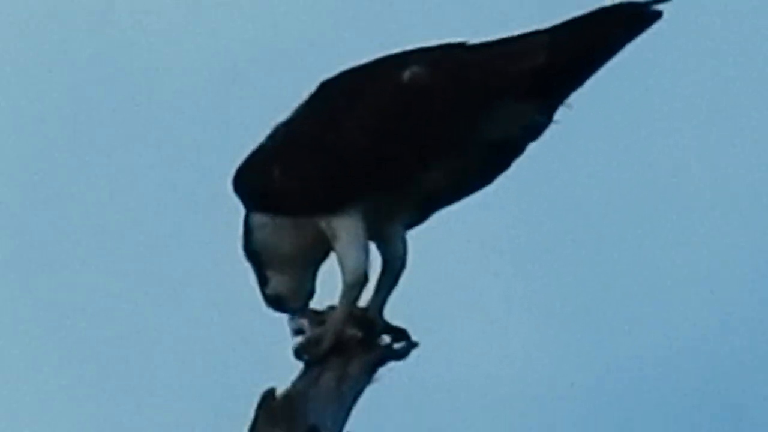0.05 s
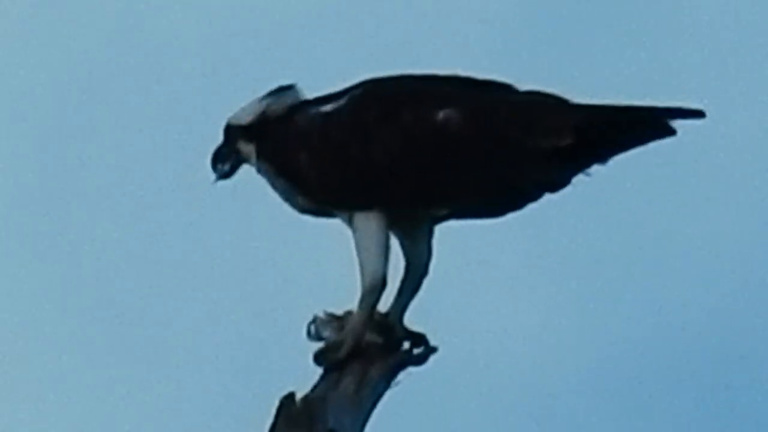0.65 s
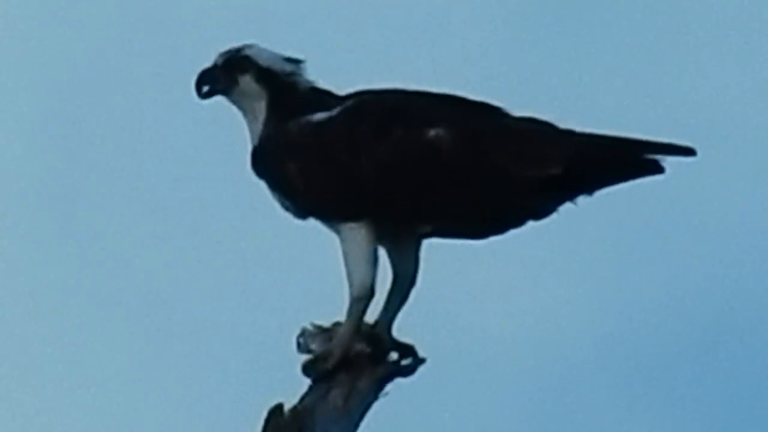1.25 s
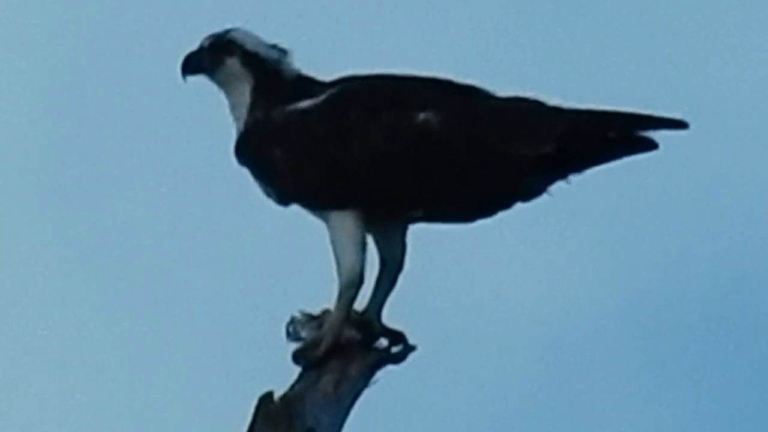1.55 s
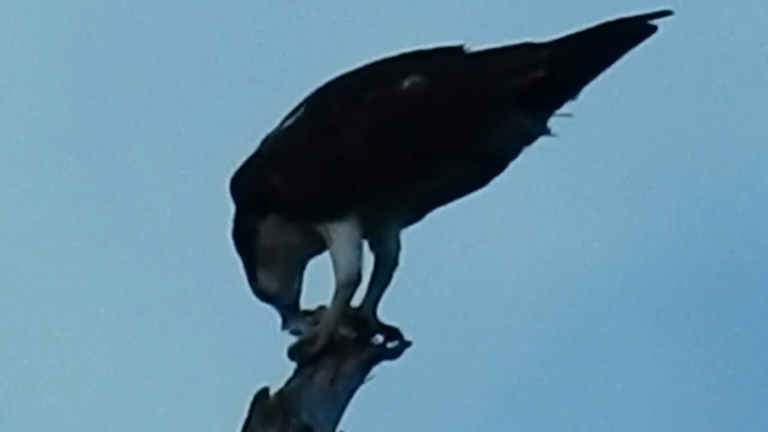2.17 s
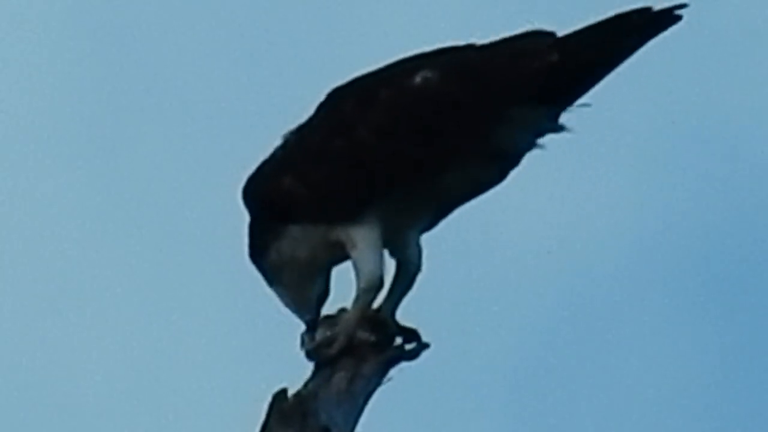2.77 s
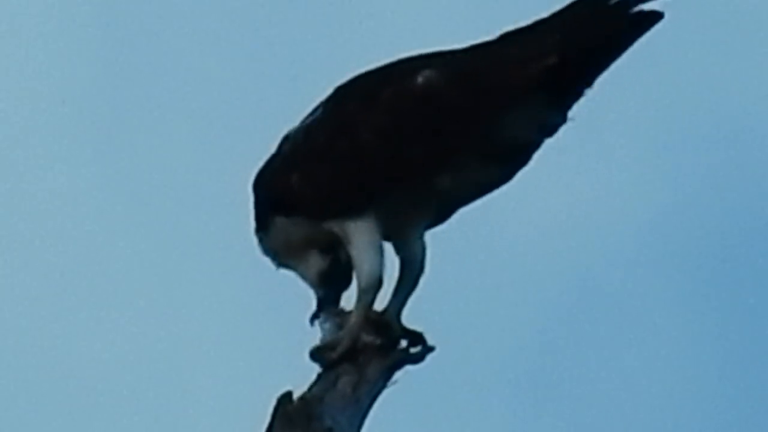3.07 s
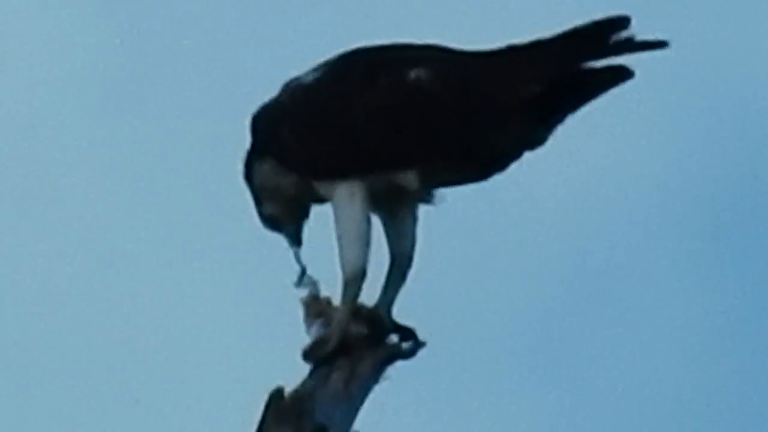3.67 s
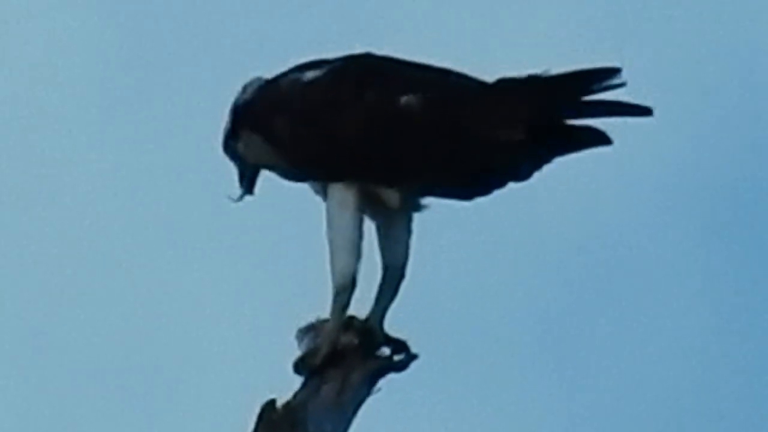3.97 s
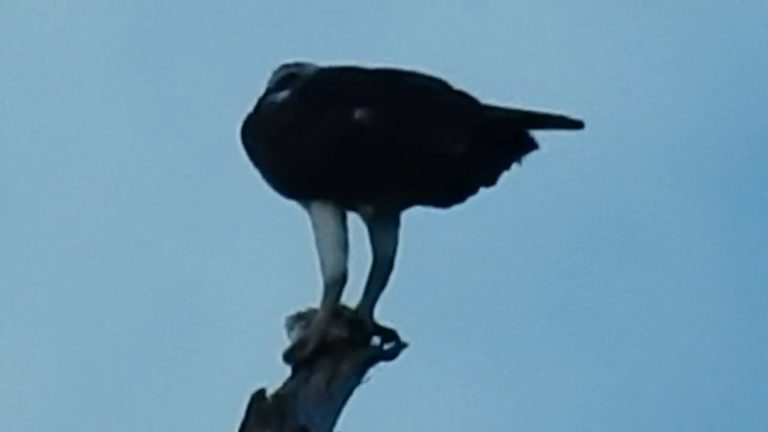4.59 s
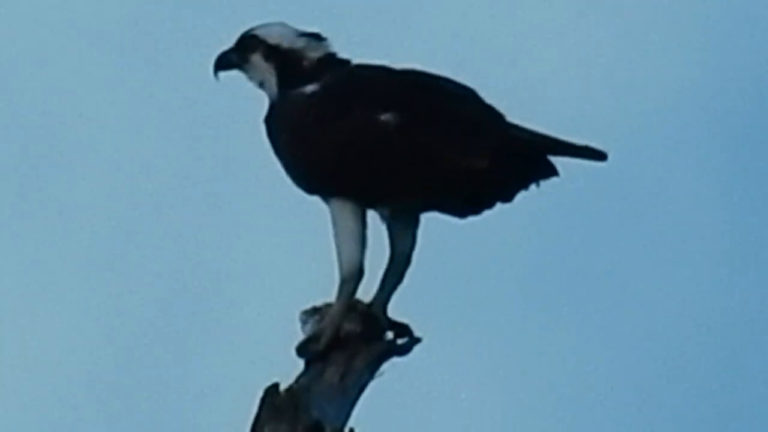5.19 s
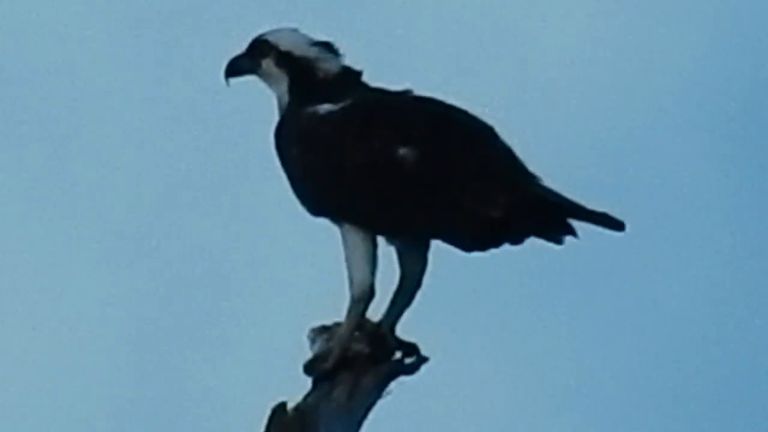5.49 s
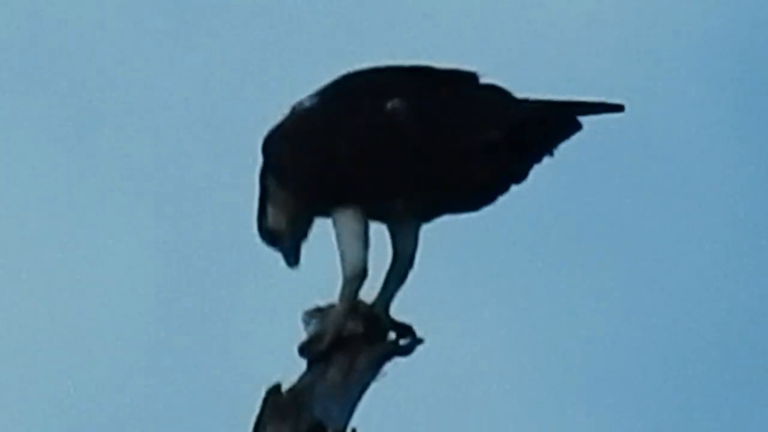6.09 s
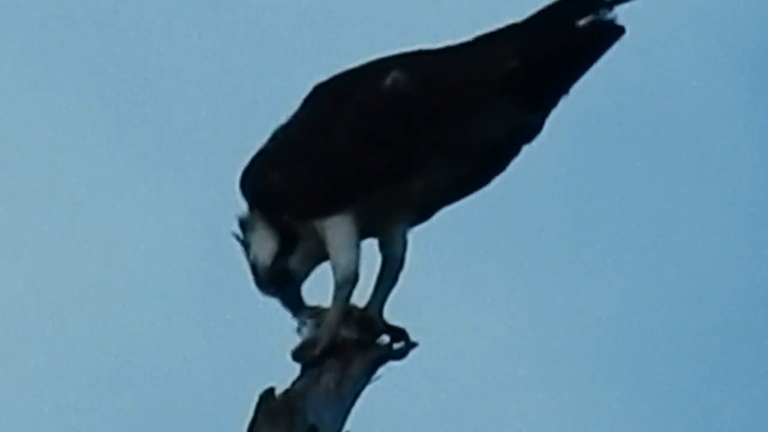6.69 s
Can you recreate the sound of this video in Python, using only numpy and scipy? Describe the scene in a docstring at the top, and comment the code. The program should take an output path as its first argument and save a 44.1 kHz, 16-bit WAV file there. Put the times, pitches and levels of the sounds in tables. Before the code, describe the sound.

Gusty wind buffets the microphone outdoors over a sizzling cicada chorus, one nearer throbbing cicada and a faint distant roar.

```python
"""A breezy summer day. From the start, gusts buffet a camera's two microphone ports, over a far roar of
traffic and trees and a sizzling cicada chorus; a near cicada on the right throbs nine times a second.
At 1 s the wings of a small insect give a short, high, stuttering buzz. The wind lulls around 2.5 s,
then returns in puffs. The near cicada slows and stops just after 5 s; at 5.6 s the small insect
buzzes again as the gusts pick up."""
import sys
import numpy as np
from scipy import signal
from scipy.fft import rfft, irfft
from scipy.io import wavfile
from scipy.ndimage import uniform_filter1d

SR = 44100
rng = np.random.default_rng(int(sys.argv[2]) if len(sys.argv) > 2 else 0)


def wav_out(sig):
    """Save sig, one row per channel (or a flat mono array), as 16-bit PCM at SR to the path in sys.argv[1]."""
    wavfile.write(sys.argv[1], SR, np.round(np.clip(np.atleast_2d(sig).T, -1, 1) * 32767).astype(np.int16))


N = 302085
TIME = np.arange(N) / SR

# strength of the wind at both ports: (time [s], level [dB])
WIND_STRENGTH = [(0, -21), (.19, -28.5), (.23, -43.5), (.41, -25.5), (.68, -29), (.72, -35), (.77, -25.5),
                 (.88, -41), (.96, -28.5), (1.3, -28.5), (1.65, -37), (2.0, -35), (2.4, -51), (2.83, -49.5),
                 (3.02, -33), (3.12, -51.5), (3.31, -34), (3.52, -42), (3.62, -31), (3.72, -42),
                 (3.88, -36), (4.0, -41), (4.33, -43.5), (4.41, -37.5), (4.72, -37.5), (5.0, -49),
                 (5.07, -37.5), (5.33, -38.5), (5.42, -57.5), (5.51, -46.5), (5.59, -29.5), (5.74, -26.5),
                 (6.2, -34.5), (6.85, -34)]


def amp(db):
    """Amplitude ratio of a level in decibels."""
    return 10 ** (np.asarray(db) / 20)


def unit(x):
    """Normalisation to rms 1."""
    return x / np.sqrt(np.mean(x ** 2) + 1e-20)


def read(points, hz):
    """Interpolation of a table on a logarithmic frequency axis."""
    f, value = np.transpose(points)
    return np.interp(np.log(hz + 1), np.log(f + 1), value)


def curve(rows):
    """Linear interpolation of a time table at every sample."""
    return np.interp(TIME, *np.transpose(rows))


def colour(x, points):
    """Zero-phase filtering by a table of (frequency [Hz], gain [dB])."""
    return irfft(rfft(x) * amp(read(points, np.fft.rfftfreq(N, 1 / SR))), N)


def drift(rate_hz):
    """Slow random modulation: low-pass noise of rms 1."""
    f = np.fft.rfftfreq(N, 1 / SR)
    return unit(irfft(rfft(rng.standard_normal(N)) * np.exp(-(f / rate_hz) ** 2) * (f > 0), N))


def ports(pan_db):
    """Constant-power panning: two gains, left exceeding right by pan_db."""
    gains = amp(np.array([pan_db, -pan_db]).reshape(2, -1) / 2)
    return gains / np.sqrt(np.mean(gains ** 2, 0))


def add(mix, start_s, sound):
    """Superposition of a sound onto the mix."""
    part = mix[..., max(round(start_s * SR), 0):][..., :sound.shape[-1]]
    part += sound[..., :part.shape[-1]]


def resonate(x, hz, width_hz):
    """Resonance at a steady or gliding frequency, by heterodyning: shift down, low-pass, shift back."""
    carrier = np.exp(2j * np.pi * np.cumsum(hz * np.ones(N)) / SR)
    pole = np.exp(-np.pi * width_hz * 1.5 / SR)
    return (carrier * signal.lfilter([(1 - pole) ** 2], [1, -2 * pole, pole * pole], x / carrier)).real


def steadied(x):
    """Division by the running rms evens out swells slower than about 1/12 s."""
    return x / np.sqrt(uniform_filter1d(x ** 2, SR // 12) + 1e-9)


def diffuse_field(spectrum, correlation):
    """Diffuse noise reaches two spaced ports with a correlation that depends on frequency."""
    left, independent = rfft(rng.standard_normal((2, N)))
    alike = np.clip(read(correlation, np.fft.rfftfreq(N, 1 / SR)), -1, 1)
    right = alike * left + np.sqrt(1 - alike ** 2) * independent
    return unit(colour(irfft(np.array([left, right]), N), spectrum))


def tree_scatter(x, t60_s, wet_db, pan_db):
    """Scattering by trunks and leaves adds decaying echoes to direct sound from the right."""
    t = np.arange(SR // 2) / SR
    taps = rng.standard_normal((2, len(t)))
    taps *= rng.random((2, len(t))) < 2000 / SR  # echoes per second
    taps *= amp(-60 * t / t60_s)
    taps *= amp(wet_db) / np.linalg.norm(taps, axis=1, keepdims=True)
    taps[1, 0] += 1
    taps[0, 3] += .5  # in the camera's shadow, the left port hears it later and weaker
    taps /= np.linalg.norm(taps, axis=1, keepdims=True)
    return ports(pan_db) * signal.fftconvolve(x[None], taps, axes=1)[:, :N]


def far_roar(level_db=-46, swell_db=.5):
    """Distant traffic and trees merge into a diffuse field, with microphone hiss on top."""
    # roar and hiss: (frequency [Hz], relative spectral density [dB])
    spectrum = [(25, -18), (70, -2.5), (130, -14), (350, -4), (650, 0.5), (950, -2.5), (1400, -9),
                (2100, -15), (3600, -19), (7000, -17.5), (9500, -29), (12000, -35), (15500, -37)]
    # likeness of left and right: (frequency [Hz], correlation [-1 to 1])
    correlation = [(60, 0.22), (300, 0.94), (640, 0.97), (1400, 0.85), (3100, 0.38), (6800, -0.3),
                   (15000, 0.32)]
    return amp(level_db + swell_db * drift(4.7)) * diffuse_field(spectrum, correlation)


def cicada_chorus(shimmer_db=.87):
    """Many far cicadas sum incoherently into one shimmering band of noise."""
    # loudness of the chorus: (time [s], level [dB])
    levels = [(0, -48), (5.0, -49), (6.0, -51), (6.85, -51.5)]
    # its balance: (time [s], left minus right [dB])
    balance = [(0, 1), (4.6, 2), (5.2, 2), (5.6, 0), (5.9, 3.5), (6.85, 5.5)]
    # its band: (frequency [Hz], relative spectral density [dB])
    spectrum = [(2000, -26), (2800, -7), (3300, -6.5), (3750, -11.5), (4000, -5), (4250, -0.5), (4700, 1.5),
                (5150, 1.5), (5700, 1), (6500, 2), (7200, -5.5), (8200, -16.5), (11000, -30)]
    # likeness of left and right: (frequency [Hz], correlation [-1 to 1])
    correlation = [(3000, 0.9), (4800, 0.62), (6000, 0.05), (8000, -0.86)]
    shimmer = shimmer_db * np.array([drift(25), drift(27)])
    return amp(curve(levels) + shimmer) * ports(curve(balance)) * diffuse_field(spectrum, correlation)


def wing_buzz(level_db=-3, stroke_hz=143, pitch_hz=7850, scrape=.43, warm_up_s=.08):
    """A pulse train: each wing stroke is a short ping, roughened by random frequency modulation."""
    # the small insect's buzzes: (start [s], end [s], relative level [dB])
    buzzes = [(1.02, 1.226, -38.5), (5.626, 5.826, -39.5)]
    strokes = np.zeros(N)
    t = np.arange(round(.0045 * SR)) / SR
    for start, end, db in buzzes:
        for s in np.arange(start, end, 1 / stroke_hz):
            cold = max(1 - (s - start) / warm_up_s, 0)  # a buzz starts soft and stuttering
            sounds = rng.random() > .5 * cold
            size = amp(db + level_db - 5 * cold) * sounds
            hz = pitch_hz * (1 + scrape * rng.standard_normal(len(t)))
            add(strokes, s, size * np.hanning(len(t)) * np.sin(2 * np.pi * np.cumsum(hz) / SR))
    buzz = colour(strokes, [(6500, -25), (7400, 5), (7800, 0), (8100, 2), (8450, -22)])
    return tree_scatter(buzz, t60_s=.3, wet_db=-7, pan_db=-3.5)


def throbs(count=45, first_period_s=.1064, last_period_s=.1278, uneven_db=1.25):
    """Amplitude modulation slows as the cicada tires: each sample's throb age, length and level."""
    # loudness of the near cicada: (time [s], relative level [dB])
    levels = [(0, -45.5), (.55, -48), (.8, -45), (1.33, -39.5), (1.46, -46), (2.05, -46.5), (2.35, -42.5),
              (2.8, -50), (3.25, -43), (3.8, -47.5), (4.05, -43.5), (4.65, -46.5), (5.05, -54)]
    periods = first_period_s + (last_period_s - first_period_s) * np.linspace(0, 1, count) ** 2
    starts = np.cumsum(periods) - periods
    dbs = np.interp(starts + periods / 2, *np.transpose(levels)) + uneven_db * rng.standard_normal(count)
    which = np.searchsorted(starts, TIME, "right") - 1
    return TIME - starts[which], periods[which], dbs[which]


def near_cicada(level_db=-3.5, click_hz=331, jitter=.04, weak_db=-4, sag_db=2, rise_s=.0084, fall_s=.017):
    """Two tymbals buckle in turn and excite resonances; the abdomen's falls as each throb stretches it."""
    # response of the tymbals: (frequency [Hz], relative gain [dB])
    tymbal_response = [(2500, -29), (3300, 11), (3750, -17), (4200, -24), (4700, -6), (5150, 19.5),
                       (5600, 18.5), (6500, 9.5), (7000, -9), (7600, -58), (10000, -40.5)]
    # resonances of the body: (frequency [Hz], bandwidth [Hz], relative level [dB])
    body_modes = [(3300, 220, -10), (4275, 130, -1), (4820, 110, -3), (5130, 130, 0), (5900, 800, -2),
                  (6600, 400, -3)]
    high_hz, low_hz, sweep_s = 5350, 4250, .027  # glide of the abdomen
    age, span, throb_db = throbs()
    gate = np.clip(age / rise_s, 0, 1) * np.clip((span - age) / fall_s, 0, 1) * amp(-sag_db * age / span)
    turns = np.floor(np.cumsum(click_hz * (1 + jitter * drift(22))) / SR)
    clicks = np.diff(turns, prepend=0) * amp(weak_db * (turns % 2) + rng.standard_normal(N))
    # each click is a volley of buckling ribs with a 1.5 ms decay
    ribs = signal.lfilter([1], [1, -np.exp(-1 / (.0015 * SR))], clicks) * rng.standard_normal(N)
    tymbals = unit(colour(ribs, tymbal_response))
    body = unit(sum(amp(db) * unit(resonate(ribs, hz, width)) for hz, width, db in body_modes))
    abdomen_hz = low_hz + (high_hz - low_hz) * np.exp(-(age / sweep_s) ** 2 / 2) + 70 * drift(30)
    swell = np.sin(np.pi * np.minimum(age / span, 1))
    abdomen = unit(resonate(ribs, abdomen_hz, width_hz=260) * swell)
    song = unit(tymbals + amp(-3.5) * body + amp(-4.5) * abdomen)
    return tree_scatter(amp(throb_db + level_db) * unit(gate) * song, t60_s=.16, wet_db=-5, pan_db=-8)


def eddy(hz, phase_cycles):
    """An eddy crossing a port is a pressure wavelet: a few cycles under a Gaussian envelope."""
    t = np.arange(-.03, .03, 1 / SR)
    return np.exp(-(t * hz) ** 2 / 2) * np.cos(2 * np.pi * (hz * t + phase_cycles))


def eddy_trains(pitches_hz, density, spread_db):
    """Shot noise: for each pitch, eddies of uneven size arrive at random, at rms 1."""
    for hz in pitches_hz:
        per_second = density * np.sqrt(hz * 200) / 2
        arrives = rng.random(N) < per_second / SR
        sizes = arrives * amp(spread_db * np.minimum(rng.exponential(1, N), 3))
        yield hz, unit(signal.oaconvolve(sizes, eddy(hz, rng.random()), "same"))


def edge_flutter(level_db=-41, onset_db=-42, growth=.18, centre_hz=310, width_octaves=.53, burst_db=4):
    """Vortex shedding: past an onset wind strength, the right port's edge sheds bursts of eddies."""
    drive = amp(curve(WIND_STRENGTH) - onset_db)
    shedding = drive ** growth * drive ** 2 / (1 + drive ** 2)  # soft threshold
    flaps = sum(train * np.exp(-(np.log2(hz / centre_hz) / width_octaves) ** 2 / 2)
                for hz, train in eddy_trains(np.geomspace(170, 900, num=9), density=.2, spread_db=2))
    bursts = unit(steadied(flaps) * amp(burst_db * np.tanh(drift(9.1))))
    return amp(level_db) * ports(pan_db=-21) * shedding * bursts


def strong_eddies(level_db=-2):
    """Pressure transients: low eddies mostly thump both ports, higher ones flap at the right."""
    # single eddies: (centre time [s], relative peak [dB], frequency [Hz], left minus right [dB])
    events = [(0.006, -12.5, 210, 4), (0.037, -18, 379, 1), (0.097, -16.5, 183.6, 1), (0.175, -13, 172, 4),
              (0.41, -25.5, 780, -19), (0.42, -16, 205, -1), (0.435, -17, 590, -26), (0.452, -17.5, 288, 8),
              (0.568, -15.5, 200, -2), (0.746, -19, 410, -27), (0.772, -18.5, 185, -2),
              (0.949, -13.5, 214, 2), (1.213, -23.5, 550, -20), (1.26, -14, 172, 2), (1.496, -17.5, 171, 4),
              (2.175, -20.5, 300, -31), (2.959, -21.5, 268, -24), (3.175, -22.5, 268, -22),
              (3.344, -20.5, 161, -3), (3.838, -23, 270, -24), (4.654, -14.5, 203, -31),
              (5.205, -22.5, 287, -25), (5.728, -20, 410, -20), (5.791, -23, 644, -21),
              (5.861, -16, 216, -1), (5.88, -18, 450, -27), (5.924, -17.5, 375, -32), (6.073, -12, 190, 0),
              (6.078, -21, 650, -28), (6.081, -18, 313, -25), (6.239, -20.5, 448, -25),
              (6.316, -21.5, 380, -22), (6.331, -23, 443, -26), (6.807, -18.5, 420, -27)]
    out = np.zeros((2, N + SR))
    for (s, db, hz, pan_db), phase in zip(events, rng.random(len(events))):
        thump = np.array([eddy(hz, phase), eddy(hz, phase + rng.uniform(-.17, .31))])
        add(out, s, amp(db + level_db) * ports(pan_db) * thump)
    return out[:, thump.shape[1] // 2:][:, :N]  # centres each eddy on its time


def buffet(force, lumpy_db=2, smooth_db=-9, tilt_db_per_octave=-3, brightening=.24):
    """Turbulence at one port holds eddies of all sizes; harder gusts shed more small, high ones."""
    # wind through the camera's low cut: (frequency [Hz], relative spectral density [dB])
    spectrum = [(20, -31), (40, -24), (68, -2), (88, -16), (115, -3.5), (175, 3.5), (270, -10),
                (400, -19.5), (700, -31), (1200, -34.5), (3000, -38.5), (9000, -72)]
    cloud = np.zeros(N)
    for hz, train in eddy_trains(np.geomspace(110, 1100, num=14), density=.11, spread_db=3):
        octaves = max(np.log2(hz / 250), 0)
        band_gain = np.sqrt(hz) * amp(read(spectrum, hz) + tilt_db_per_octave * octaves)
        cloud += train * band_gain * (force / force.mean()) ** (brightening * octaves)
    rush = amp(smooth_db) * unit(colour(rng.standard_normal(N), spectrum))
    return force * steadied((unit(cloud) + rush) * amp(lumpy_db * drift(31)))


def wind(puff_db=2, pan_db=-1):
    """Gusts modulate both ports together, but each has its own turbulence; the right faces the wind."""
    force = amp(curve(WIND_STRENGTH) + puff_db * drift(9.2))
    return ports(pan_db) * np.array([buffet(force), buffet(force)])


def scene():
    """Superposition of wind close by, a roar far away and insects around."""
    close_wind = wind() + edge_flutter() + strong_eddies()
    return close_wind + far_roar() + cicada_chorus() + near_cicada() + wing_buzz()


def record(dry):
    """Band limiting by the camera's low-pass filter, after a 2 ms fade-in."""
    faded = dry * np.minimum(TIME / .002, 1)
    low_pass = signal.firwin(1023, cutoff=15800, window=("kaiser", 9), fs=SR)
    return signal.oaconvolve(faded, low_pass[None], "same")


dry = scene()
out = record(dry)
wav_out(out)
```